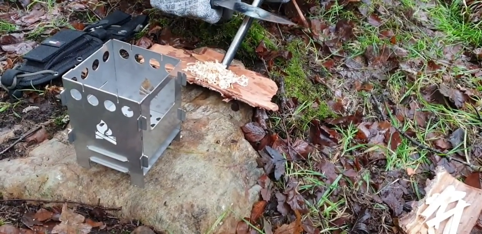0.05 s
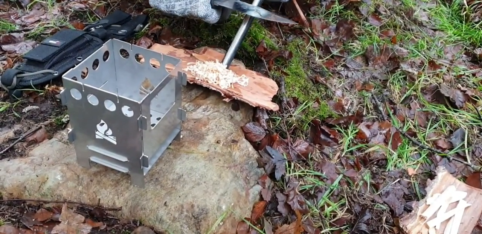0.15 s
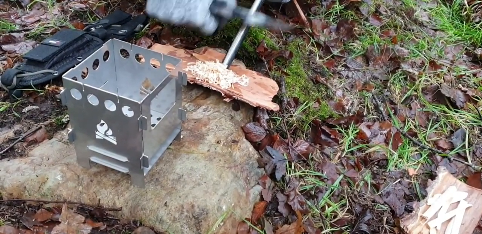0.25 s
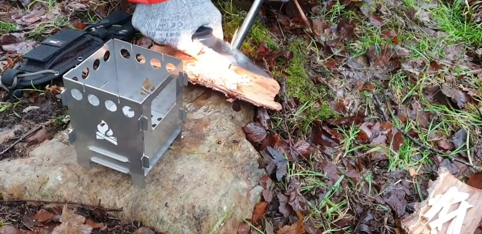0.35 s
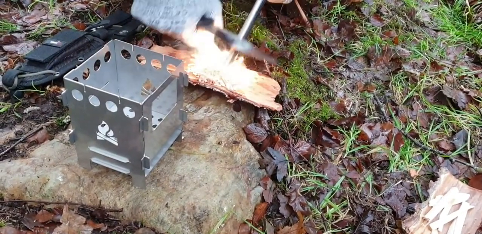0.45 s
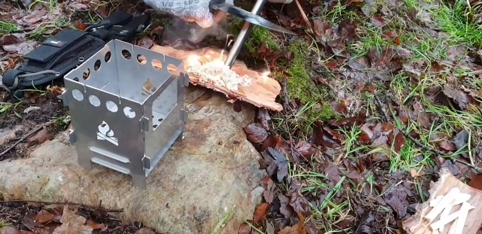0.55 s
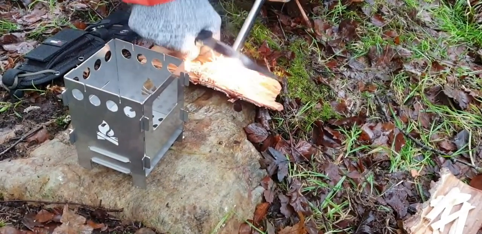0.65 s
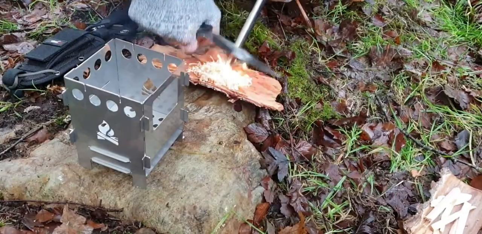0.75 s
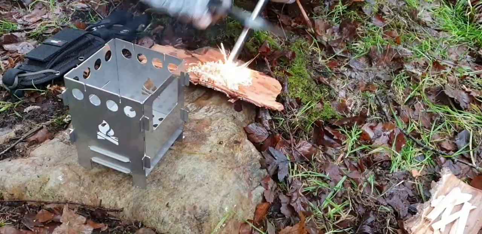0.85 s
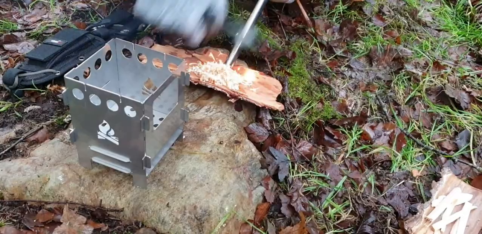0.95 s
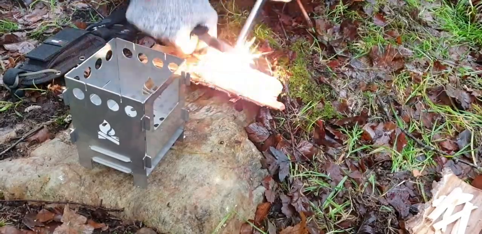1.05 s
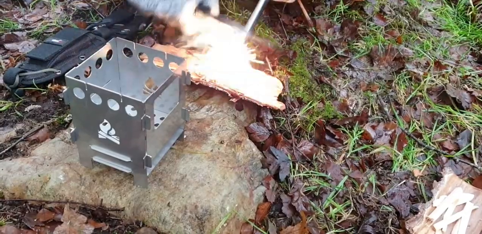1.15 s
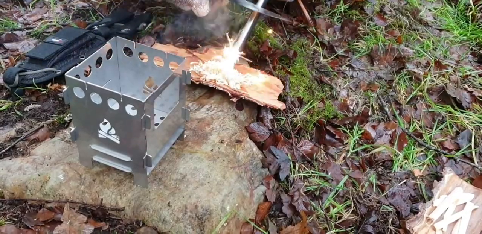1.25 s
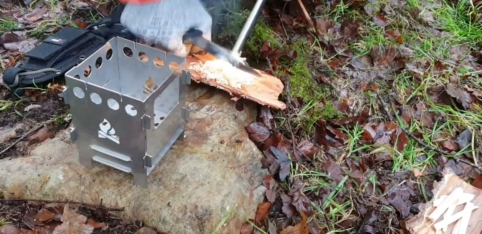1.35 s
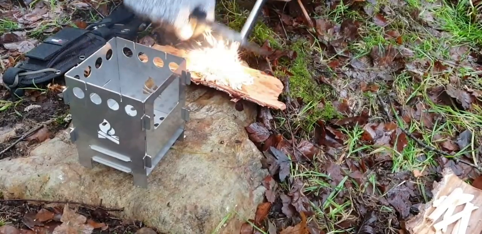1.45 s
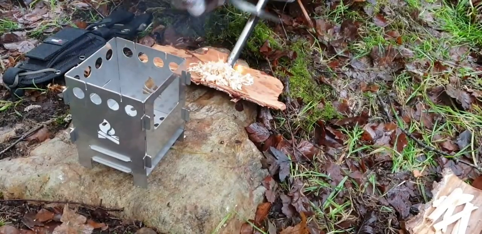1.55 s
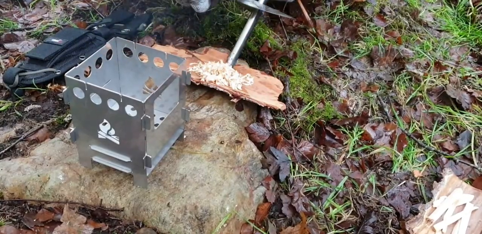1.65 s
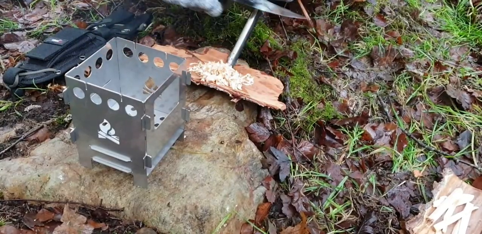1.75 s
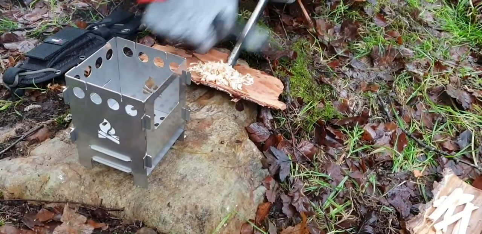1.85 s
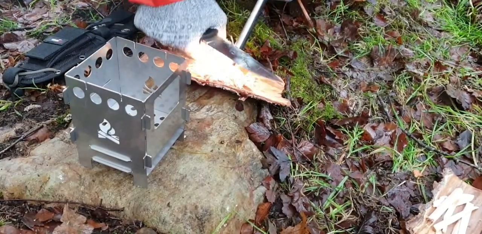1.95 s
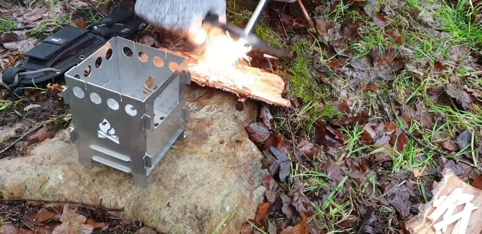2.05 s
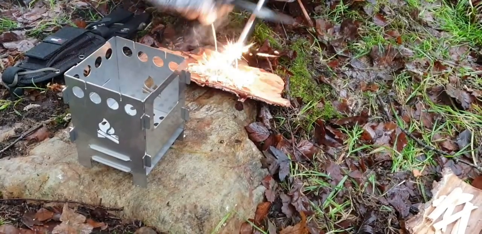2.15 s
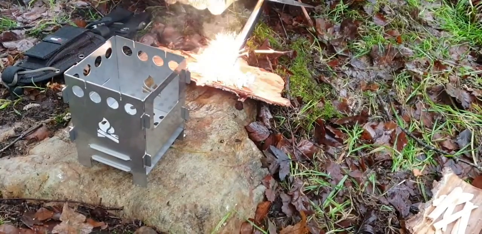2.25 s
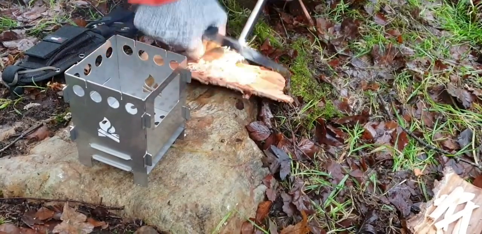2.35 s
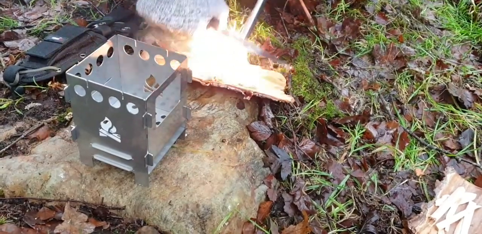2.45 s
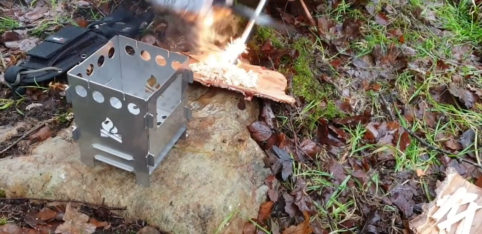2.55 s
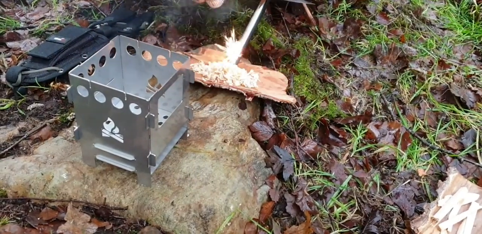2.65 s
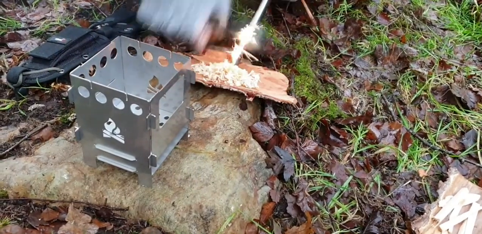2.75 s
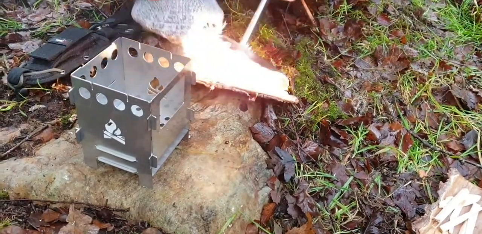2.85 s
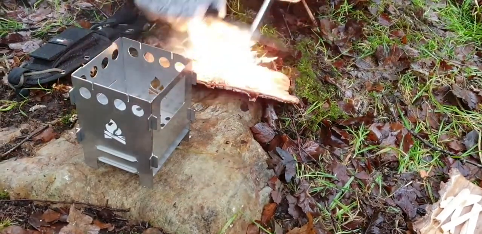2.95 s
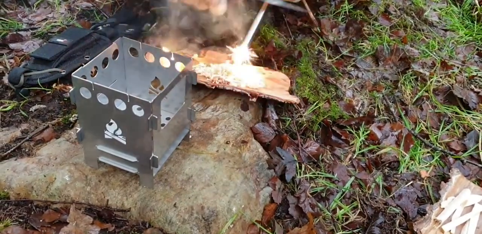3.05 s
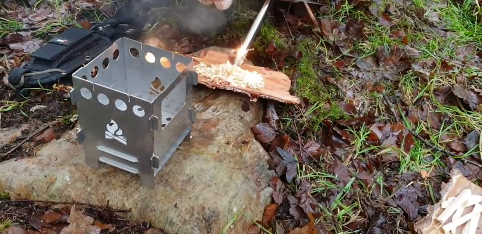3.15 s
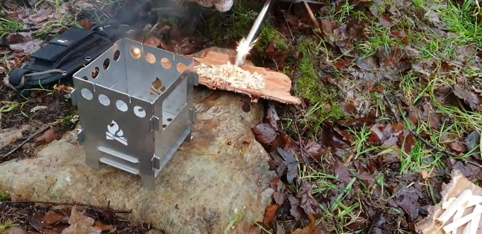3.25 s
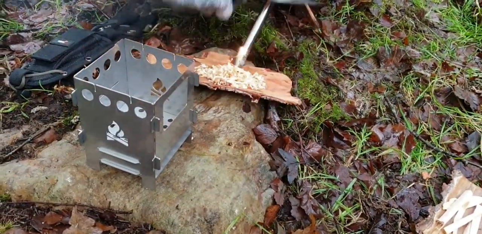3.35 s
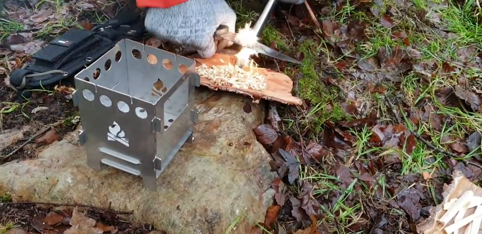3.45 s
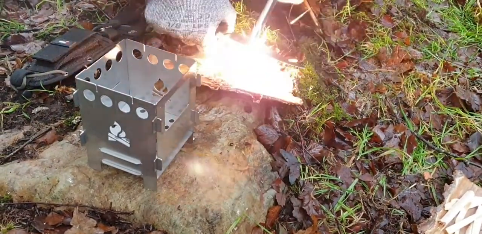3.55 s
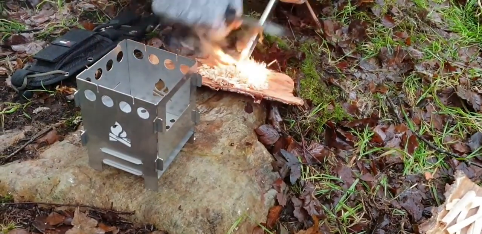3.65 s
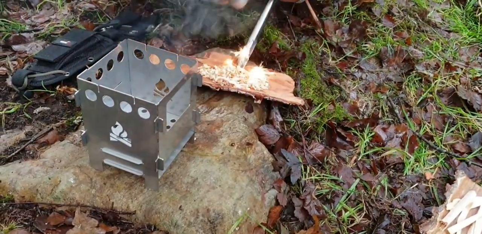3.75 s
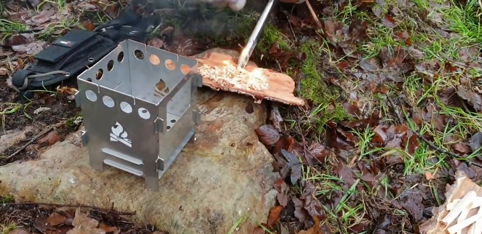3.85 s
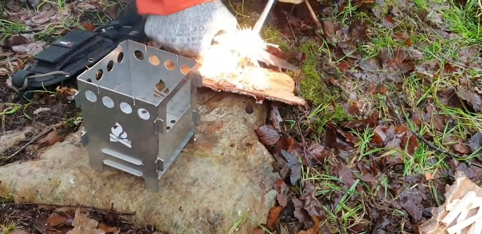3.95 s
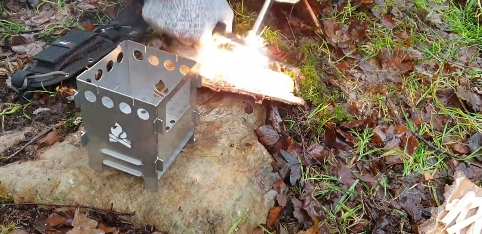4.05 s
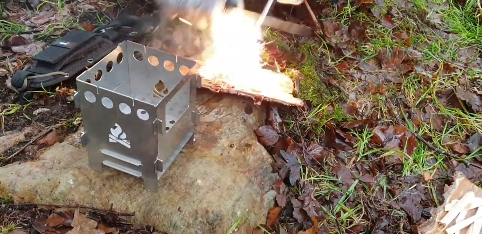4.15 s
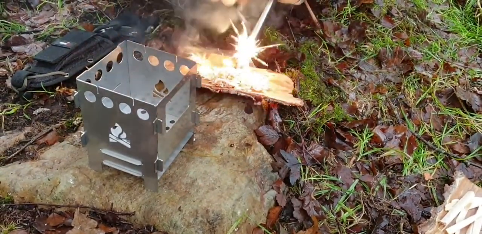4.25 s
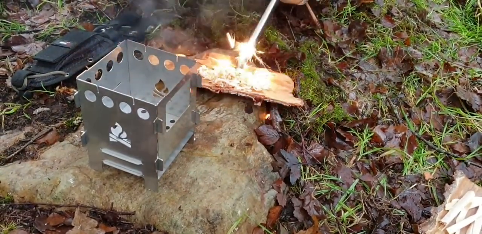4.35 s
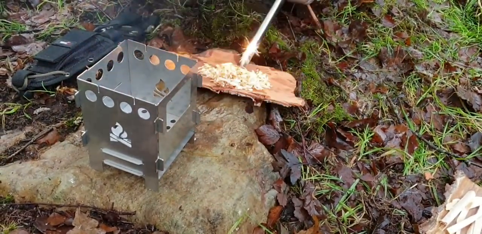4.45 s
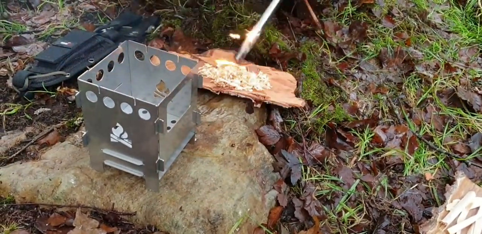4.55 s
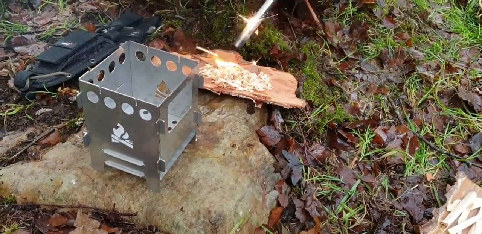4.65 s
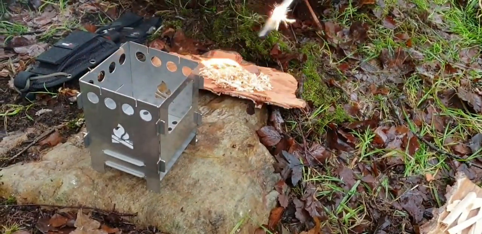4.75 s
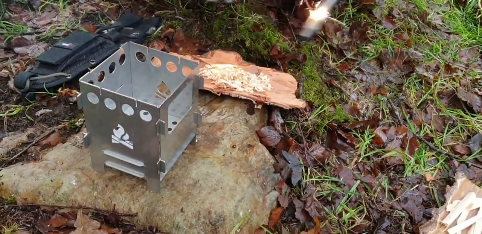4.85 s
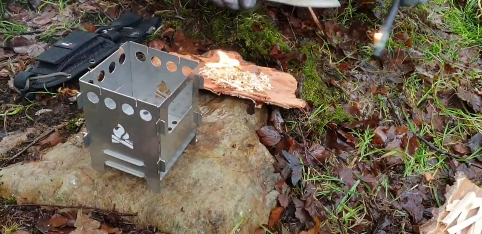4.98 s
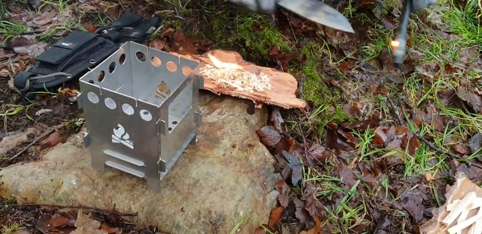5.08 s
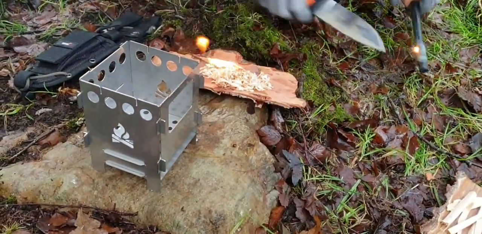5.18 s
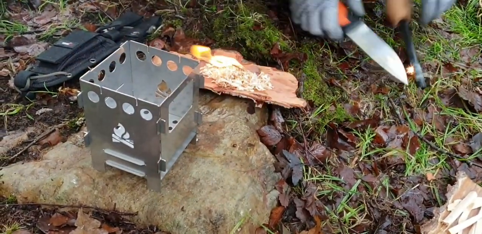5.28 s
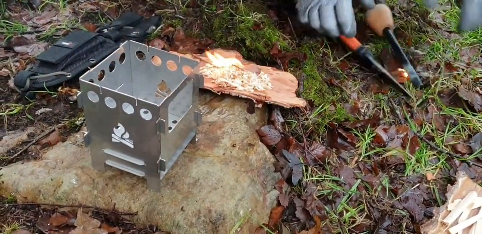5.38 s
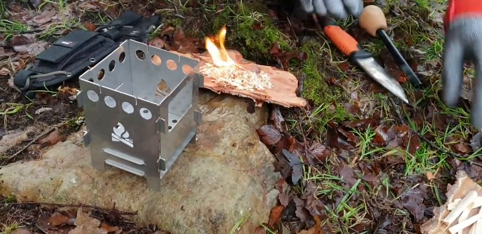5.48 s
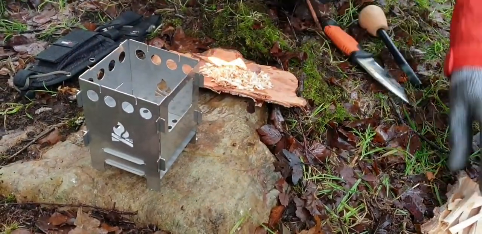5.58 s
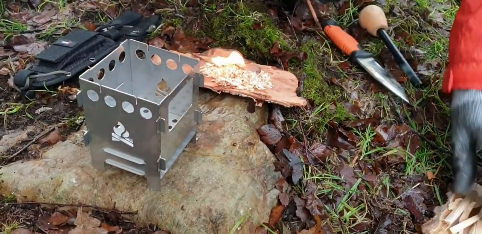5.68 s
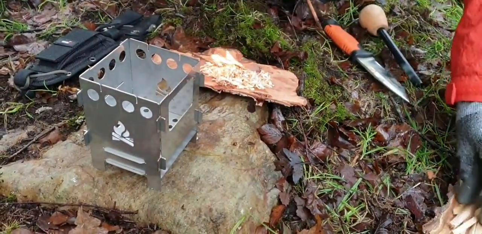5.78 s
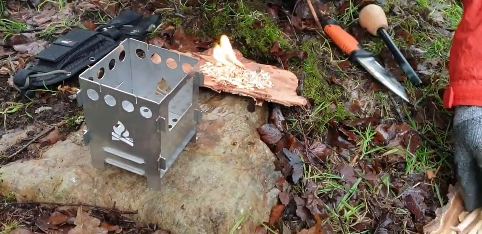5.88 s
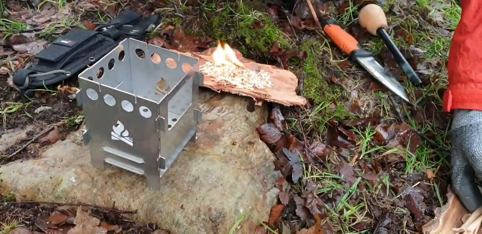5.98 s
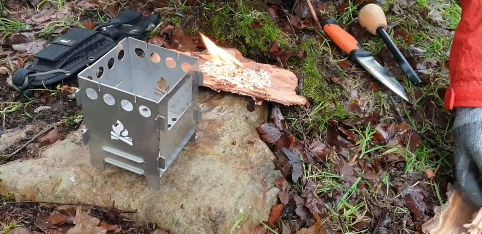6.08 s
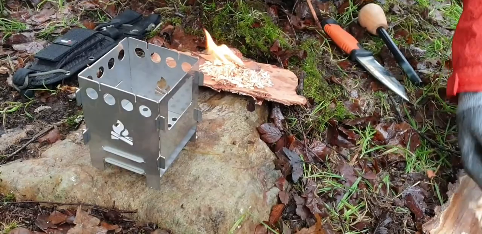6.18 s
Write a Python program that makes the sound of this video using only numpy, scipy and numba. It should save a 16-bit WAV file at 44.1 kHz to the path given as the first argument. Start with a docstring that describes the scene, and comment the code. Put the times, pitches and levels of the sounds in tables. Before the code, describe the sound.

A knife scrapes hard along a steel fire rod in repeated gritty, bright strokes, then the tools drop softly into leaves in a quiet wood.

```python
"""A gritty, bright scraping, close up in a quiet wood: a knife spine is worked along a steel rod over
shavings on a slab of bark, then the tools are laid in the leaves. The edge slips and catches in dense
grains that shake edge, blade and bark; hands thump the ground, a sleeve brushes by, traffic is far off.
The microphone is a small camera with two ports: the left faces the work and rings near 7 kHz,
the right is shadowed."""
import sys
import numpy as np
from scipy import signal
from scipy.fft import rfft, irfft
from scipy.io import wavfile
from scipy.ndimage import uniform_filter1d
from numba import njit

SR = 44100
rng = np.random.default_rng(int(sys.argv[2]) if len(sys.argv) > 2 else 0)


def to_wav(s):
    """Save 16-bit WAV."""
    ch = np.atleast_2d(s).T  # columns
    pcm = np.round(np.clip(ch, -1, 1) * 32767)  # PCM
    wavfile.write(sys.argv[1], SR, pcm.astype(np.int16))


N = 274346


def undb(db):
    """Decibels to gain."""
    return 10 ** (np.asarray(db) / 20)


def walk(rate_hz):
    """Smooth random drift with a spread near 1."""
    step = max(int(SR / rate_hz), 2)
    held = np.repeat(rng.standard_normal(N // step + 1), step)
    return 1.15 * uniform_filter1d(uniform_filter1d(held, step), step)[:N]


def swells(t, start_s, swell_s, hold_s, fade_s, level_db):
    """Summed level in dB of gestures held from start_s; swell and fade are per 20 dB, with a floor."""
    coarse = t[::44, None]
    before = np.clip(start_s - coarse, 0, None) / np.maximum(swell_s, .035)
    after = np.clip(coarse - start_s - hold_s, 0, None) / np.maximum(fade_s, .03)
    power = np.sum(undb(level_db - 20 * (before + after)) ** 2, axis=1)
    return np.interp(t, coarse[:, 0], 10 * np.log10(power + 1e-12))


def ports(alike, lag_s=0):
    """White noise at both ports: the right one gets a late share of the left one."""
    left, other = rng.standard_normal((2, N))
    late = np.interp(np.arange(N) - lag_s * SR, np.arange(N), left)
    return np.array([left, alike * late / np.std(late) + np.sqrt(1 - alike ** 2) * other])


def colour(pair, spectrum, lo_hz=0.91, hi_hz=1e5):
    """Filter each port by the lo_hz to hi_hz part of a spectrum, scaled to a set total power."""
    size = 8192
    f = np.arange(size // 2 + 1) * SR / size + 1
    hz, *port_db = np.transpose(spectrum)
    band = 1 / np.sqrt((1 + (lo_hz / f) ** 30) * (1 + (f / hi_hz) ** 30))
    rolloff_db = 40 * np.log2(np.clip(f / hz[0], 0, 1) / np.clip(f / hz[-1], 1, None))
    gain = undb([np.interp(np.log(f), np.log(hz), db) + rolloff_db for db in port_db]) * band + 1e-6
    gain /= np.sqrt(np.mean(np.sum(gain ** 2, axis=0)) / 4)
    cepstrum = irfft(np.log(gain))
    cepstrum[:, 1:size // 2] *= 2  # minimum phase: nothing rings ahead of a crack
    cepstrum[:, size // 2 + 1:] = 0
    return signal.oaconvolve(pair, irfft(np.exp(rfft(cepstrum))), axes=1)[:, :N]


@njit
def bandpass(x, hz, width_hz):
    """State-variable band-pass with a moving centre, gain 1 there."""
    y, band, low = np.empty(len(x)), 0., 0.
    for i in range(len(x)):
        g, damping = np.tan(np.pi * hz[i] / SR), width_hz / hz[i]
        v = (band + g * (x[i] - low)) / (1 + g * (g + damping))
        band, low, y[i] = 2 * v - band, low + 2 * g * v, damping * v
    return y


def resonance(pair, hz, width_hz):
    """One steep-sided resonance at both ports: two band-passes in series."""
    return [bandpass(bandpass(x, hz, float(width_hz)), hz, float(width_hz)) for x in pair]


def wood():
    """Faint air and far traffic among the trees."""
    # spectrum of the background: freq_hz, left_db, right_db
    air = [(28.7, -8, -7), (60.6, 1, -13), (160, -2, -9.5), (275, -6, -9.5), (680, -13.5, -36),
           (1530, -28, -18), (2520, -34, -45), (3970, -22.5, -28), (4670, -40, -53), (6000, -17, -39),
           (7160, -50, -60), (8500, -66, -43), (11000, -45, -39), (15700, -48, -36)]
    return undb(-64) * colour(ports(alike=.6, lag_s=.0001) * undb(1.2 * walk(4)), air)


def soil_rumble(t):
    """A steady low rumble that swells as the rod is shoved down through the bark into the soil."""
    # shoves on the rod: start_s, hold_s, level_db
    shoves = [(0.413, 0.022, -48.5), (0.693, 0.069, -49), (1.07, 0.052, -45), (1.20, 0.045, -52),
              (1.396, 0.041, -56.5), (1.922, 0.18, -54), (2.36, 0.09, -47), (2.81, 0.069, -45.5),
              (3.097, 0.028, -58), (3.534, 0.025, -47), (4.00, 0.033, -45.5), (4.13, 0.14, -48.5),
              (4.45, 0.064, -54), (5.366, 0.045, -57), (6.15, .07, -54)]
    # spectrum of the soil: freq_hz, left_db, right_db
    soil = [(20, -25.4, -31.6), (40, -1.9, -7.2), (70, 0.0, -4.5), (110, -2.5, -5.8), (170, -6.5, -7.8),
            (300, -31.2, -33.6)]
    start_s, hold_s, level_db = np.transpose(shoves)
    shoved = undb(swells(t, start_s, swell_s=.11, hold_s=hold_s, fade_s=.19, level_db=level_db))
    shake = np.hypot(shoved, undb(-60)) * undb(1.4 * walk(18))
    deep = colour(ports(alike=.55) * shake, soil, hi_hz=91)
    dull = colour(ports(alike=.93) * shake, soil, lo_hz=87)
    return undb(-4.5) * deep + undb(-6) * dull


def thumps(t):
    """Tools and hands land on bark and soil: damped low tones, louder on the left."""
    # landings: start_s, right_db, pitch_hz, t60_s
    landings = [(0.324, -34, 534, 0.014), (1.377, -33.5, 276, 0.027), (1.897, -29, 473, 0.014),
                (2.183, -39, 910, .015), (3.797, -36.5, 620, 0.017), (5.33, -45, 69.5, 0.16),
                (5.353, -39, 86, 0.14), (5.422, -33, 74, 0.086), (5.58, -47, 59, 0.13),
                (6.13, -45, 58.8, 0.31)]
    out = 0
    for start_s, right_db, hz, t60_s in landings:
        age = np.clip(t - start_s, 0, None)
        envelope = (1 - np.exp(-age * hz * 2.8)) * undb(-60 * age / t60_s)
        out += undb([[right_db + 6.5], [right_db]]) * envelope * np.sin(2 * np.pi * hz * age)
    return out


def sleeve(t):
    """Cloth on cloth: a soft swish around one broad resonance."""
    # a sleeve brushing past: start_s, swell_s, hold_s, fade_s, level_db
    brushes = [(4.76, 0.64, 0.015, .05, -54), (5.024, .1, 0.044, .4, -60), (5.497, .14, 0.023, .3, -49),
               (5.97, 0.8, .03, 5, -62.5), (6.09, .15, 0.026, -2, -54.5), (6.22, .1, 0.024, -4, -56)]
    gain = undb(swells(t, *np.transpose(brushes)) + 16.5 + 1.6 * walk(20))
    hz = 900 * (1 + .04 * walk(5))
    return undb([[0], [-2.5]]) * resonance(ports(alike=.8) * gain, hz, width_hz=560)


def squeaks(t):
    """The sliding blade squeaks: short swells of noise in one narrow mode each."""
    # squeaks: centre_s, pitch_hz, level_db, length_s
    slides = [(1.335, 1170, -55, 0.018), (1.50, 4730, -54, 0.041), (1.724, 1100, -61.5, 0.051),
              (1.736, 1870, -63.5, 0.088), (1.724, 4670, -61.5, 0.067), (1.8, 4900, -65, 0.075),
              (1.878, 3630, -42, 0.014), (2.184, 1060, -46, 0.018), (2.187, 1940, -48, 0.017),
              (3.426, 4900, -46.5, 0.086), (3.677, 2340, -47.5, 0.056), (4.718, 3400, -51.5, 0.013),
              (5.829, 4100, -55, 0.025)]
    out, noise = np.zeros((2, N)), ports(alike=.13, lag_s=.00006)
    for centre_s, hz, level_db, length_s in slides:
        near = abs(t - centre_s) < 3 * length_s
        swell = undb(level_db + 27) * np.exp(-((t[near] - centre_s) / (length_s / 2)) ** 2)
        pitch = np.full(len(swell), float(hz))
        out[:, near] += undb([[0], [-6]]) * [bandpass(x[near] * swell, pitch, 217.) for x in noise]
    return out


def slips(rate_hz, scatter_db, t60_s, steady):
    """Stick-slip envelope: random slips of uneven size, each dying fast, over a steady rub; rms 1."""
    chance, size = rng.random((2, N))
    kicks = (chance < rate_hz / SR) * undb(-scatter_db * np.log(size + 1e-9).clip(-4, 0))
    power = signal.lfilter([1], [1, -np.exp(-2 * np.log(1000) / (t60_s * SR))], kicks ** 2)
    power = steady + power / np.mean(power)
    return np.sqrt(power / np.mean(power))


def catches(part, trim_db):
    """Envelope of the catches in one part: the edge loads up, cracks free and settles."""
    # edge catches and leaf cracks: start_s, peak_db, then relative to it hiss_db, upper_db, lower_db
    cracks = [(0.329, -23, -13, -17, -10), (0.384, -20.5, -9.5, -13.5, -12), (0.4064, -23, -0.5, -18, -8),
              (0.5935, -24, -17, -21, -14), (0.6478, -26.5, -9, -9, -26), (0.7337, -13, -21, -36, -23),
              (0.8373, -16.5, -29, -25, -20), (0.8756, -16.5, -15, -23, -18),
              (0.8967, -12, -14.5, -13.5, -22), (1.011, -11, -29, -8.5, -14), (1.068, -20.5, -20, -16, -12),
              (1.175, -21.5, -6, -26, -15), (1.1918, -13, -29, -31, -25), (1.3773, -20, -12, -2.5, -6),
              (1.3869, -12.5, -8.5, -6.5, -19), (1.4528, -18.5, -17, -22, -19),
              (1.8892, -21, -16, -17, -16.5), (1.9117, -9, -17.5, -11.5, -19.5),
              (2.1066, -22, -10, -22, -23), (2.1156, -20, -15, -21, -31), (2.171, -20, -15, -25, -33),
              (2.2323, -19, -11, -33, -35), (2.4925, -16.5, -23, -30, -28),
              (2.5335, -18.5, -14, -24.5, -22), (2.6239, -30, -7, -28, -10),
              (2.6583, -32.5, 1.5, -19.5, -19), (2.751, -26.5, -14, -22, -20),
              (2.8135, -19.5, -8, -21, -27), (2.828, -16.5, -8, -13, -10), (2.8615, -19, -10, -23, -20),
              (3.028, -24.5, -14, -16, -27), (3.1353, -23.5, -12, -21, -18), (3.234, -34.5, -8, -31, -38),
              (3.2848, -27, -6, -25, -26), (3.3147, -25, -11, -26, -23.5), (3.3262, -27, -10, -24, -26),
              (3.3702, -35, -5.5, -13, -18), (3.7532, -31.5, -1.5, -6, -11), (3.7896, -40, 2, -10, 4),
              (3.7981, -32.5, 0, -7, 5), (4.0146, -18.5, -8, -26, -12), (4.126, -29, -14, -12, -13),
              (4.2457, -23, -4, -28, -34), (4.2762, -26.5, -4, -13, -24), (4.3182, -23.5, -8.5, -20.5, -25),
              (4.372, -35, 1.5, -22, -20), (4.4154, -28, -10, -24, -32), (4.4508, -31.5, -1.5, -12, -28),
              (4.5074, -18.5, -10.5, -23, -19.5), (4.5435, -21.5, -4, -20, -15.5),
              (4.6001, -24, -16, -26, -21), (4.624, -28, -21, -21, -26), (4.6414, -22, -10, -16, -19),
              (4.7887, -19, -8.5, -13.5, -19.5), (4.8595, -30, -6, -15, -27), (4.8868, -34, -3, -16, -25),
              (5.3453, -37, -6, -19, -18), (5.363, -35, -13, -20, -27), (5.4036, -33, -11, -24, -14),
              (5.7298, -39, -21, 0.5, 7), (5.8333, -38, -18.5, -18, -10), (5.9177, -37.5, -14, -14, -5),
              (5.9563, -32, -20, -10, -6), (5.971, -20, -15, -15, -18.5), (5.9953, -39, -11, -2, -8),
              (6.0141, -32.5, -20, -5, -1), (6.0873, -28.5, -15, -20, -23), (6.0926, -24, -23, -33, -35)]
    power, lead = np.zeros(N + SR), SR // 40
    t = np.arange(-lead, SR // 10) / SR
    age = np.clip(t, 0, None)
    load = .062 * np.exp(np.where(t < 0, t / .009, -t / .013))
    for start_s, peak_db, hiss_db, upper_db, lower_db in cracks:
        part_db = dict(rasp=0, hiss=hiss_db, upper=upper_db, lower=lower_db)[part]
        t60_s = max(.012 + .0002 * peak_db, .004)  # harder ones last longer
        crack = (1 - np.exp(-age / .0003)) * undb(-60 * age / t60_s)
        i = int(start_s * SR) - lead
        power[i:i + len(t)] += (undb(peak_db + part_db + trim_db) * (crack + load)) ** 2
    return np.sqrt(power[:N])


def bark_slab(rub, push, level_db):
    """The bark under the rod answers rubbing and catches with a dull, woody sound."""
    # spectrum of the slab: freq_hz, left_db, right_db
    bark = [(130, -22, -23.5), (200, -4, -5.5), (400, -3, -5), (600, -4, -6), (900, -5, -7.5),
            (1300, -18, -22)]
    shake = np.hypot(rub(level_db - 5.5, bite=.9, flicker_db=.77), catches("lower", trim_db=-8))
    return colour(push(shake, alike=.92), bark)


def ringing(drive, modes, drift, flicker_db):
    """Each mode drifts and swells at random, as when the contact point travels along the rod."""
    out = 0
    for hz, width_hz, *port_db in modes:
        centre_hz = hz * (1 + drift * walk(9))
        swell = undb(flicker_db * walk(16))
        out += undb(port_db)[:, None] * resonance(drive * swell, centre_hz, width_hz)
    return out


def blade(rub, push, upper_db, lower_db):
    """Blade and rod, damped by gloved hands, ring and grate when rubbed and snap at each catch."""
    # lower and upper modes of the steel: pitch_hz, width_hz, left_db, right_db
    low_modes = [(1099, 470, -5, -10.5), (1442, 400, -6, -4.5), (1880, 544, -1.5, -9.5),
                 (2114, 92, -7.5, -23.5), (2560, 1850, -9.5, -22)]
    high_modes = [(3000, 124, -3, -11.5), (3566, 870, 1.5, -2.5), (4176, 78, -1, 0), (4645, 167, -3, -4),
                  (5320, 430, -42, -57)]
    # broad spectrum of the blade: freq_hz, left_db, right_db
    steel = [(750, -33.3, -34.2), (1100, -7.6, -12.3), (1400, -4.4, -10.0), (1750, -2.1, -9.4),
             (2150, -8.2, -14.4), (2500, -6.2, -13.1), (2950, -10.3, -12.6), (3500, -4.4, -9.4),
             (4200, -4.0, -11.4), (4700, -3.8, -9.3), (5200, -7.5, -13.1), (6200, -20.0, -39.8)]
    split_hz = 2900
    upper, lower = rub(upper_db, bite=.88, flicker_db=.4), rub(lower_db, bite=.84, flicker_db=.83)
    ring = undb(11) * ringing(push(upper, alike=.4), high_modes, drift=.025, flicker_db=3.4)
    ring += undb(11.5) * ringing(push(lower, alike=.75), low_modes, drift=.025, flicker_db=3.6)
    jolt = push(catches("lower", trim_db=17.5), alike=.72)
    knock = ringing(jolt, low_modes, drift=.02, flicker_db=3.1)
    grit = colour(push(upper, alike=.4), steel, lo_hz=split_hz)
    grit += colour(push(lower, alike=.75), steel, hi_hz=split_hz)
    # a catch is over before the modes build up, so it also gives a dry, broad snap
    snap = colour(push(catches("upper", trim_db=5.5), alike=.069), steel, lo_hz=split_hz)
    snap += colour(push(catches("lower", trim_db=3.5), alike=1), steel, hi_hz=split_hz)
    return ring + knock + undb(-5.5) * grit + snap


def edge(rub, push, rasp_db, low_rasp_db, hiss_db, fizz_db):
    """The edge rasps on the rod and rings the left port; spark hiss and fizz lie above."""
    # spectrum of the edge at the microphone: freq_hz, left_db, right_db
    spectrum = [(4300, -31.6, -37.7), (5300, -13.4, -19.7), (6300, -6.3, -27.1), (6800, -2.3, -29.3),
                (7150, 0.0, -29.7), (7500, -2.7, -28.5), (8000, -12.8, -27.6), (8800, -19.7, -29.4),
                (9400, -17.5, -31.0), (10200, -9.6, -28.7), (11200, -8.7, -24.4), (12800, -12.7, -24.6),
                (14000, -19.6, -23.2), (15700, -22.3, -24.8)]
    shoulder_hz, notch_hz, fizz_hz = 6600, 8800, 12400  # borders of the four bands
    rasp = np.hypot(rub(rasp_db - .77, bite=1.28, flicker_db=2.2), catches("rasp", trim_db=2))
    out = undb(low_rasp_db - 12.5) * colour(push(rasp, alike=.45), spectrum, hi_hz=shoulder_hz)
    out += undb(-5.5) * colour(push(rasp, alike=.4), spectrum, shoulder_hz, notch_hz)  # port ring
    hiss = np.hypot(rub(hiss_db - 3, bite=1, flicker_db=1), catches("hiss", trim_db=6))
    out += colour(push(hiss, alike=.25), spectrum, notch_hz, fizz_hz)
    fizz = np.hypot(rub(fizz_db - 1.7, bite=.35, flicker_db=1.5), catches("hiss", trim_db=2.8))
    return out + colour(push(fizz, alike=.35), spectrum, lo_hz=fizz_hz)


def gestures(t):
    """Levels in dB of rasp, hiss, upper blade, lower blade and bark, all moved by the same hands."""
    # passes along the rod: start_s, swell_s, hold_s, fade_s, rasp_db,
    # then relative to the rasp hiss_db, ring_db, weight_db (on blade and bark)
    strokes = [(0.276, -0.06, 0.034, -0.2, -44, -8.5, -2, -2),
               (0.308, 0.01, 0.031, 0.01, -29.5, -11, -10.5, -2.5),
               (0.394, 0.0775, 0.038, 0.09, -27.5, -7, -12, 2),
               (0.522, 0.12, 0.034, 0.03, -33.5, -11.5, -9.5, 2),
               (0.682, 0.1751, 0.065, 0.22, -29.5, -10.5, -10.5, -2),
               (0.614, 0, 0.013, -0.02, -36.5, -19, -3.5, -15),
               (0.864, 0.11, 0.1, 0.22, -29, -13.5, -12, -4.5),
               (1.048, 0.1346, 0.044, 0.26, -30, -7, -5.5, 2.5),
               (1.191, 0.07, 0.033, 0.12, -29.5, -6.5, -10, -1),
               (1.372, 0.09, 0.015, 0.0548, -32, -11, -2.5, -0.5),
               (1.441, 0.12, 0.021, 0.0547, -28.5, -10.5, -7.5, 1.5),
               (1.52, -0.1, 0.083, 0, -48, -10, 0, 4), (1.698, 0.2, 0.12, .2, -55, -21, -9, 0.5),
               (1.848, 0, 0.039, -1.8, -42.5, -7.5, -2.5, 0),
               (1.899, -0.0642, 0.04, 0.39, -30, -8.5, -8.5, 1),
               (2.028, 0.14, 0.13, 0.4, -33.5, -6.5, -13.5, -0.5),
               (2.227, -0.21, 0.09, 0.48, -33, -7.5, -9, -2), (2.351, -0.1, .14, 0.15, -32.5, -4, -10, 2.5),
               (2.622, 0.8, 0.073, -1, -44, -2.5, -12.5, 2),
               (2.768, 0.07, .02, -0.03, -36.5, -13.5, -5, -2),
               (2.816, 0.0557, 0.046, 0.33, -28.5, -4, -6.5, 2.5),
               (3.057, -1, 0.094, -0.03, -39, -2, -12.5, -2.5),
               (3.238, -0.4, 0.026, -0.9, -46, -2.5, -29, -17),
               (3.281, -0.3, 0.032, 0.6, -44, -4.5, -17, -5.5),
               (3.39, -0.16, 0.098, 0.33, -38.5, -4, -7, -1.5),
               (3.501, 0.07, 0.12, 0.05, -31.5, -4.5, -9.5, 1),
               (3.663, -0.1, 0.046, 0.23, -45, -7, -4.5, 6),
               (3.732, -0.03, .06, 0.05, -44.5, -6.5, -9, 7.5),
               (3.908, .04, 0.018, 0.03, -39, -17, -3.5, 2.5), (3.98, .1, 0.02, 0.27, -29, -2.5, -8.5, 2.5),
               (4.122, 0.11, 0.018, 0.4267, -30.5, -3, -8, 3.5)]
    # hands and tools stirring leaves and shavings: same columns
    rustles = [(0, 0.12, .01, 0.37, -61.5, -11.5, -5, 5.5), (4.50, 0.055, 0.014, 0.043, -46, -2, -8, -12),
               (4.43, 0.071, .03, 0.091, -66, -9, -10, -15), (4.54, 0.019, 0.014, .05, -49, -7, -6, -1.5),
               (4.62, 0.045, 0.047, 0.1, -38, -2.5, -9, -4), (4.72, 0.042, 0.013, .1, -47, -3, -3, 3),
               (4.849, 0.16, 0.037, 0.079, -45, -1.5, -5, -4.5),
               (5.05, 0.32, 0.15, 0.21, -55, -1.5, -3.5, 4), (5.36, 0.15, 0.054, .2, -54, -4, -10, 2),
               (5.51, 0.26, 0.023, 0.26, -51.5, -5.5, -0.5, 7.5),
               (5.80, 0.4, 0.057, 0.12, -55, -5, -3.5, 6), (5.92, .05, .03, .1, -54, -9.5, -5, 7.5),
               (5.965, 0.032, .01, 0.053, -44.5, -1, -5, 1.5), (6.085, 0.08, .01, 0.06, -48, -4.5, -4, 0),
               (6.15, 0.18, .1, .3, -64.5, -5, -2.5, 7.5)]
    *timing, fade_s, rasp_db, hiss_db, ring_db, weight_db = np.transpose(strokes + rustles)
    fuller_db = np.repeat([0, 3.5], [len(strokes), len(rustles)])  # rustles have more body
    body_db = ring_db, weight_db - 10 + fuller_db, 1.29 * weight_db - 17
    edge_levels = [swells(t, *timing, fade_s, rasp_db + db) for db in (0, hiss_db)]
    body_levels = [swells(t, *timing, .78 * fade_s, rasp_db + db) for db in body_db]  # fade sooner
    return edge_levels + body_levels


def scraping(t, low_rasp_db, fizz_db):
    """Strokes and rustles: one stream of slips shakes edge, blade and bark."""
    rasp_db, hiss_db, upper_db, lower_db, bark_db = gestures(t)
    grain = slips(rate_hz=300, scatter_db=.5, t60_s=.022, steady=1.25) * undb(1.49 * walk(40))
    lag_s = .0001 + .00005 * walk(3.19)

    def rub(level_db, bite, flicker_db):
        """Envelope of one part: bite deepens the grain; its own flicker is capped at 1.5 dB."""
        return undb(level_db + min(flicker_db, 1.5) * walk(24.87)) * grain ** bite

    def push(envelope, alike, smear_s=.0028):
        """Noise under an envelope; the right port hears it smeared by way of ground and leaves."""
        fall = np.exp(-1 / (smear_s * SR))
        shadowed = np.sqrt(signal.lfilter([1 - fall], [1, -fall], envelope ** 2))
        return ports(alike, lag_s) * [envelope, shadowed]

    return (edge(rub, push, rasp_db, low_rasp_db, hiss_db, hiss_db + fizz_db)
            + blade(rub, push, upper_db, lower_db) + bark_slab(rub, push, bark_db))


def scene():
    """The work in front of the microphone, with sleeve, ground and the wood around it."""
    # balance as the hands move right: time_s, right_db, low_rasp_db, fizz_db (relative to the hiss)
    balance = [(0, -2, 7.5, -8), (.6, -0.9, -1.5, -4), (2.1, -1.3, 2.5, -6.5), (3, -0.3, 4.5, -7.5),
               (4.4, 0, 6.5, -7), (4.8, 0, 11.5, -4), (5.3, 1, 9.5, -3.5), (6.22, 3, 9, 0)]
    t = np.arange(N) / SR
    time_s, *columns = np.transpose(balance)
    right_db, low_rasp_db, fizz_db = (np.interp(t, time_s, column) for column in columns)
    work = scraping(t, low_rasp_db, fizz_db) + squeaks(t)
    work[1] *= undb(right_db)
    return work + sleeve(t) + soil_rumble(t) + thumps(t) + wood()


def record(dry):
    """The camera cuts the top steeply above 15.7 kHz."""
    return signal.sosfilt(signal.ellip(12, .3, 80, 15720, fs=SR, output="sos"), dry)


dry = scene()
out = record(dry)
to_wav(out)
```